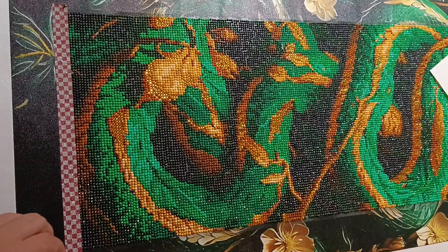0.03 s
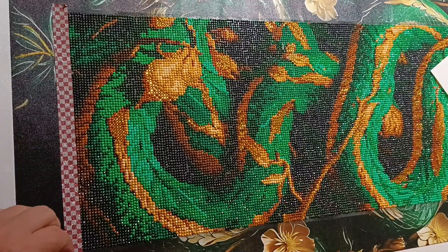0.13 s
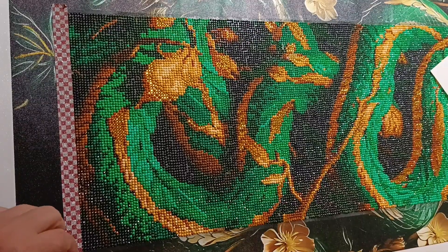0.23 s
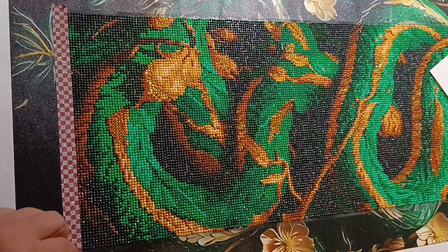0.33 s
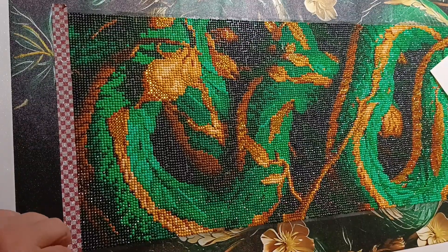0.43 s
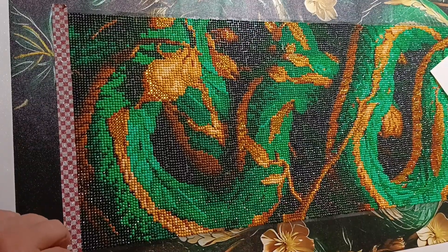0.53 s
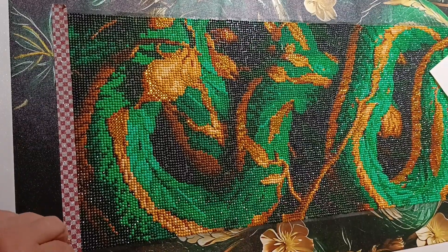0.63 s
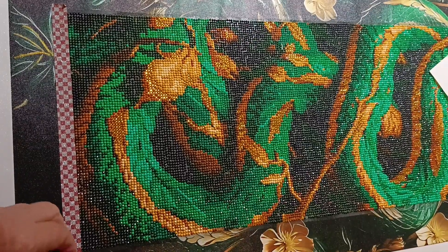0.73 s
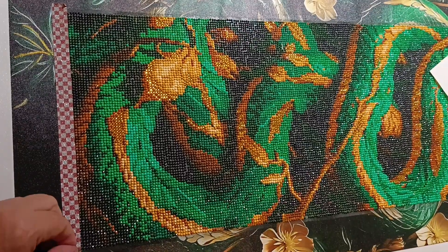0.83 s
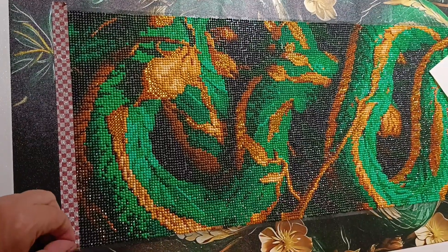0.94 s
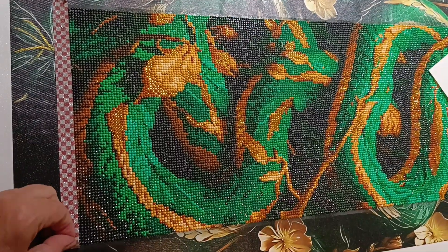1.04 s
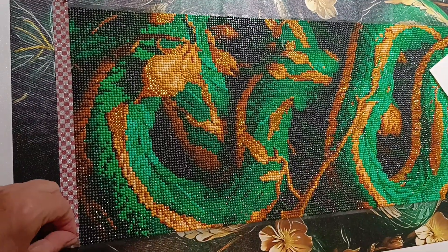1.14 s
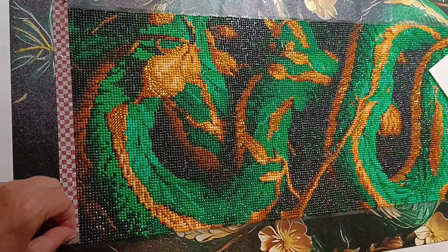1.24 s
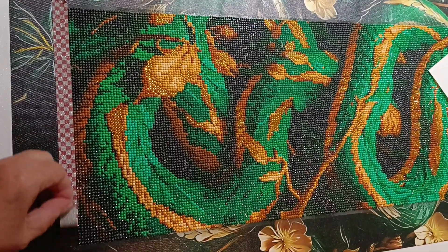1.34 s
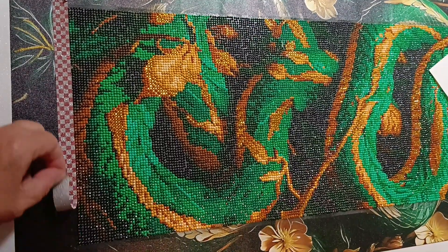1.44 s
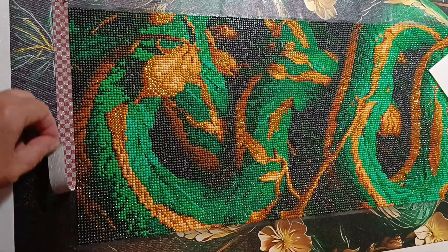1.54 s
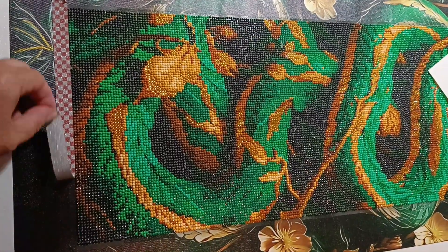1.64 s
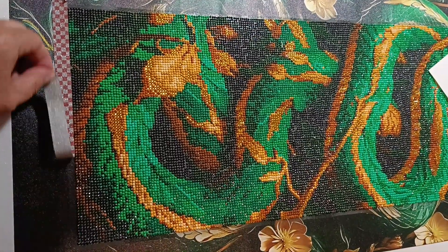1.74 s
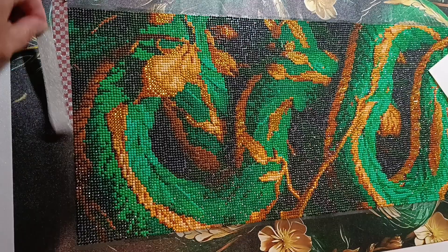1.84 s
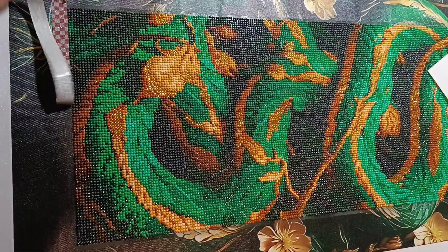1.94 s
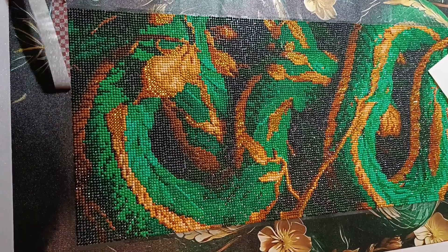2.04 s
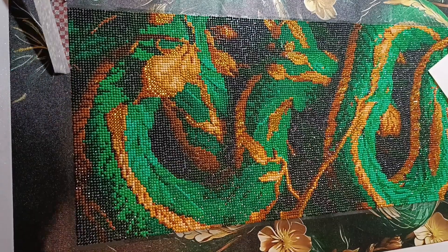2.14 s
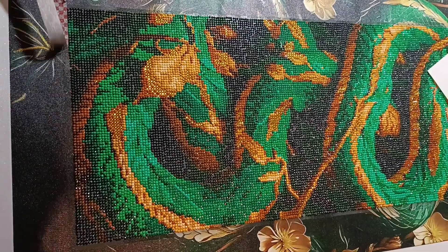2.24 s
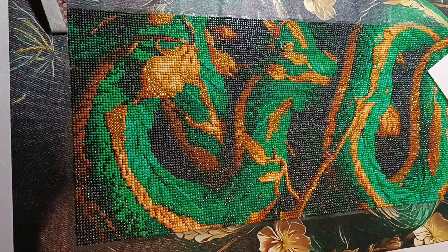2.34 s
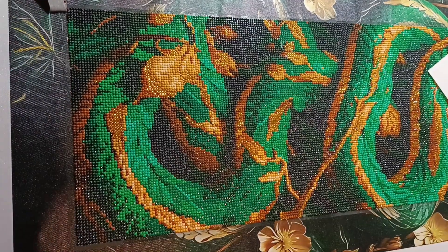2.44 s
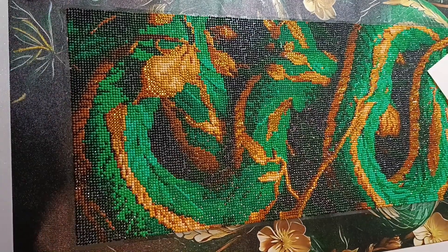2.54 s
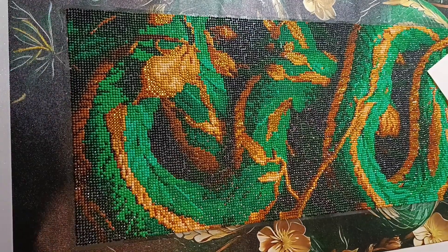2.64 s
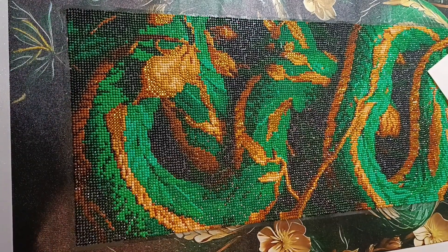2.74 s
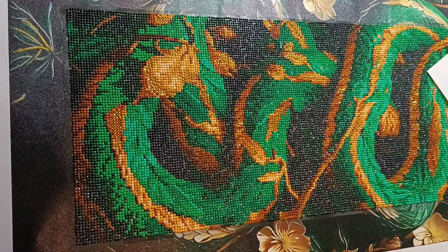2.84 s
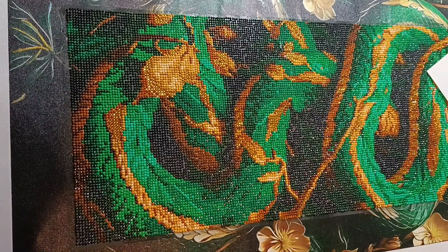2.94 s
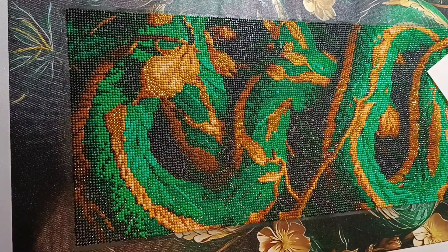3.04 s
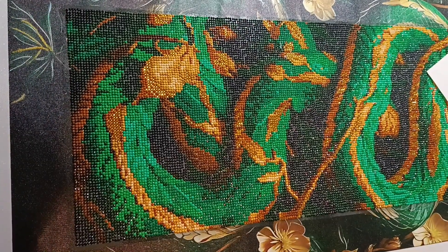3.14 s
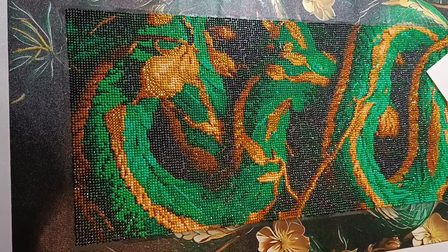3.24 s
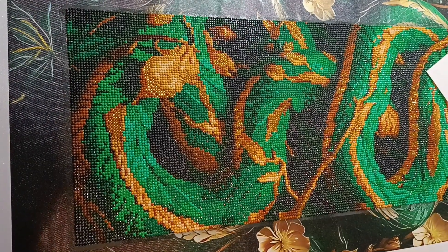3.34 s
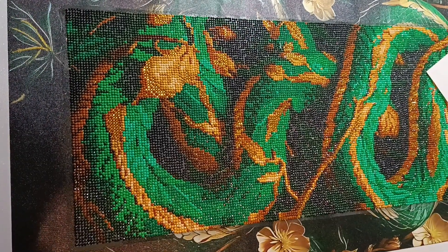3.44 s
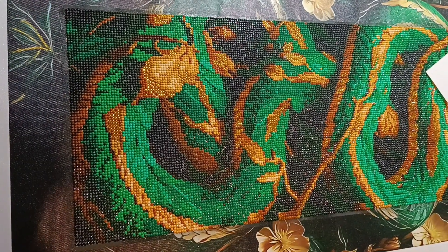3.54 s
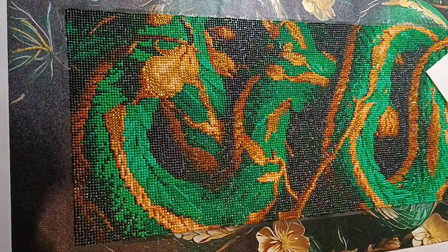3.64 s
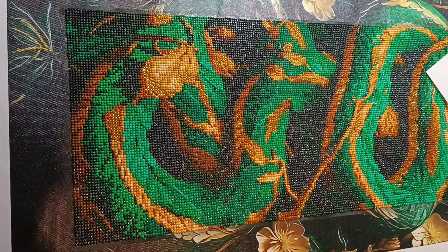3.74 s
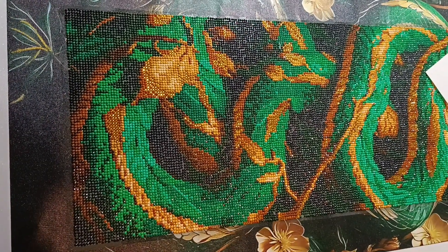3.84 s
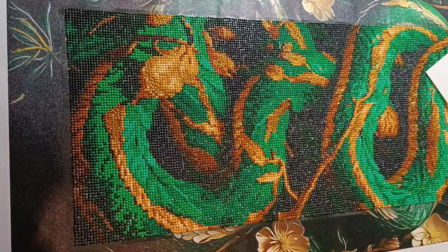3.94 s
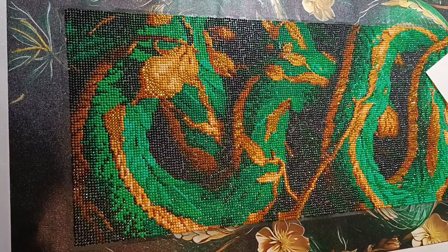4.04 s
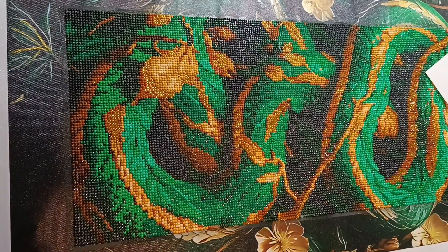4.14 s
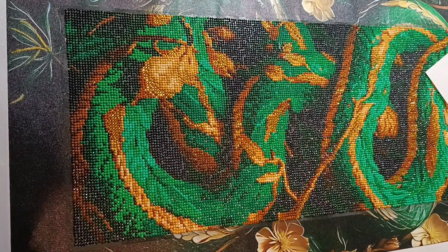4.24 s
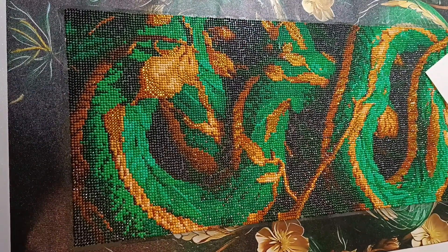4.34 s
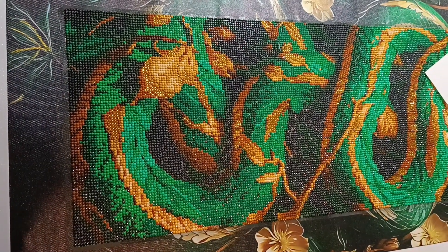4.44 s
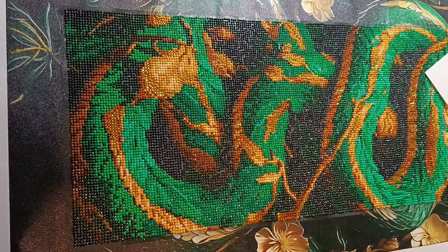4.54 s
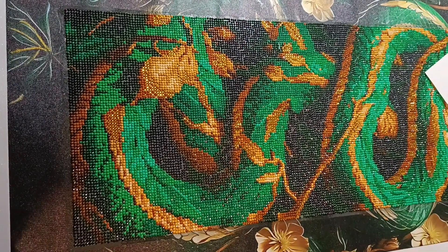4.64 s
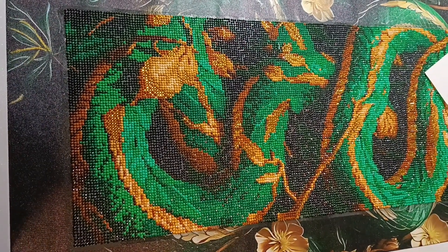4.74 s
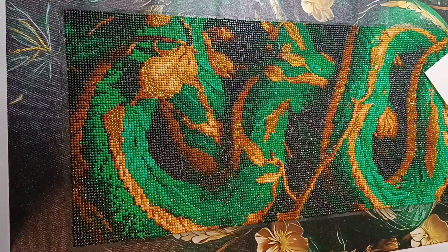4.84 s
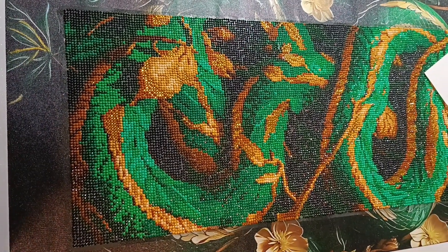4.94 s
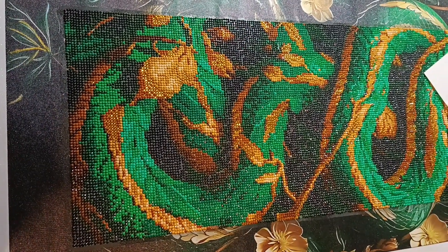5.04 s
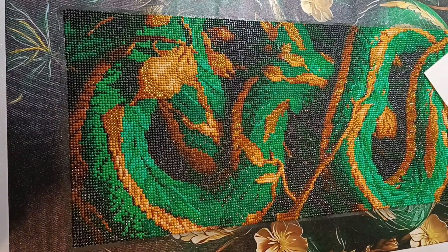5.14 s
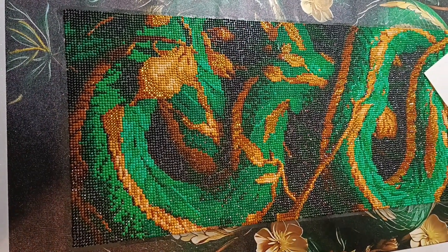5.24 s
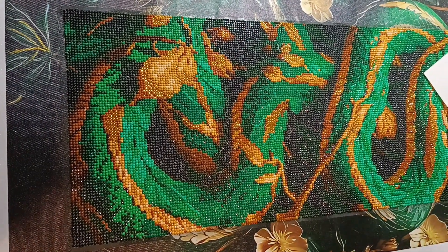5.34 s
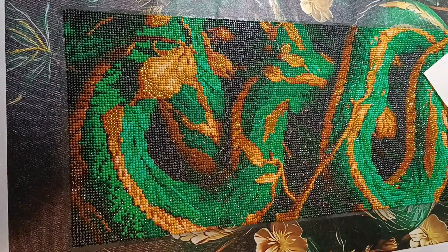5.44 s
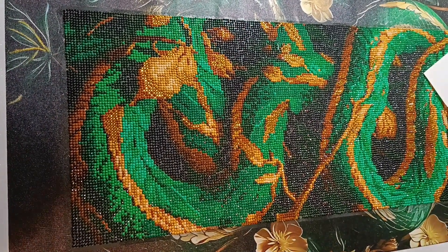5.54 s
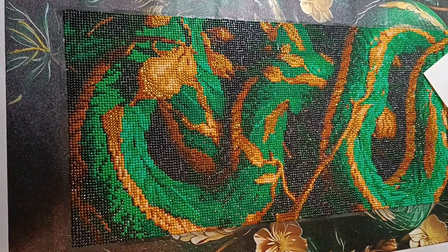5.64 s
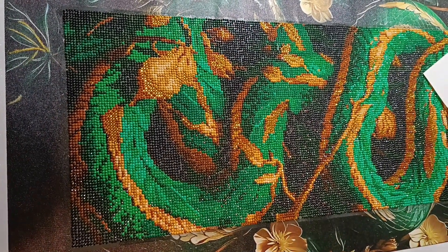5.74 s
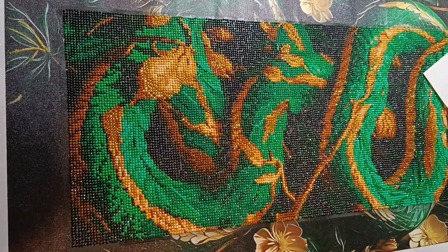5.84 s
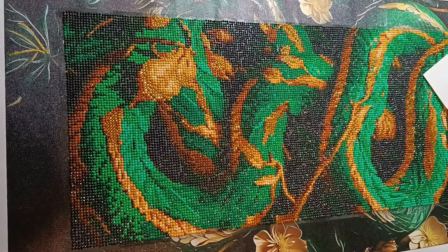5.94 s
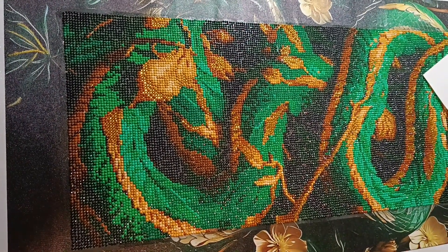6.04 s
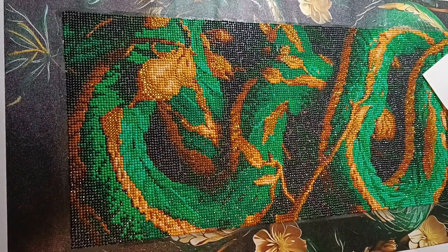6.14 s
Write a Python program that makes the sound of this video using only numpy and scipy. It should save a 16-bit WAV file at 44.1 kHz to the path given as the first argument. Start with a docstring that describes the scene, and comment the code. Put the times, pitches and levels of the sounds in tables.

```python
"""A strip of patterned tape is peeled off the sticky edge of a diamond painting canvas, close to a phone on a table.
Stiff film buckles with sharp clicks (short noise bursts through a resonance); glue lets go in swarms of tiny snaps.
Fingers hiss over the film (fine random grain), hard things are knocked, and hands bump (table modes) and drag
(low noise, one faint groan). A small room answers the film and the knocks; quiet air noise lies behind it all."""
import sys
import numpy as np
from scipy import signal
from scipy.fft import rfft, irfft
from scipy.io import wavfile

SR = 44100
rng = np.random.default_rng(int(sys.argv[2]) if len(sys.argv) > 2 else 0)


def store_wav(level_fs):
    """Save 16-bit WAV to argv[1]."""
    pcm = np.round(np.clip(np.atleast_2d(level_fs), -1, 1) * 32767)
    wavfile.write(sys.argv[1], SR, pcm.T.astype(np.int16))


N = 272524

# tone of film cracks, relative: f/Hz, level/dB
CRACK_TONE = [(200, -17.5), (700, -13), (1200, -10), (1800, -4), (3000, -1.5), (6000, -1.5), (8300, -2.5),
              (10000, 1.5), (12000, 5), (16000, 0)]
# tone of a hand working the table top, relative: f/Hz, level/dB
TABLE_RUB_TONE = [(40, -25), (75, -7.5), (112, 4), (150, -13.5), (195, 3.5), (245, -4), (310, -1),
                  (430, -6), (560, -17), (1000, -19), (2500, -22), (6000, -40)]


def snaps(peak_s=0.00025, q=3, ring_db=-2.5, crack_db=-0.1, apart=0.24, tilt_db_per_octave=5.5, even_hz=5150):
    """Each buckle is a burst about a millisecond long: a bright crack and the ring of its patch."""
    # sharpest snaps of the film: t/s, level/dB before the ring and crack offsets, ring pitch f/Hz
    snap_rows = [(0.053, -44, 6040), (.2733, -58, 7000), (.5436, -50, 6200), (0.849, -43.5, 3400),
                 (1.1337, -36, 4560), (1.2323, -31, 2590), (1.2366, -28, 2380), (1.263, -20.5, 2220),
                 (1.2813, -14.5, 2440), (1.2951, -16.5, 2440), (1.3055, -24, 2800), (1.3118, -25, 2870),
                 (1.3163, -19.5, 2900), (1.3374, -25.5, 3080), (1.343, -18, 3700), (1.7045, -31, 6950),
                 (1.8062, -28.5, 6900), (1.814, -34.5, 7300), (1.8419, -22.5, 6600), (1.8474, -27, 7500),
                 (1.8556, -13, 7530), (1.968, -39.5, 6300), (2.0139, -30, 7600), (2.0682, -36.5, 6000),
                 (2.0816, -33.5, 5200), (2.1098, -31.5, 4730), (2.128, -22.5, 5000), (2.1394, -21.5, 4370),
                 (2.159, -32, 6540), (2.172, -17, 4200), (2.1776, -16, 4040), (2.212, -23.5, 5300),
                 (2.2161, -24, 5330), (2.234, -32, 7300), (2.361, -21, 6500), (2.3816, -18.5, 5900),
                 (2.4626, -26, 7400), (2.4723, -14.5, 6130), (2.5046, -23.5, 3480), (2.5209, -24.5, 3660),
                 (2.6781, -33, 6800), (2.6866, -26, 3520), (2.7062, -35.5, 4800), (2.7716, -55, 3400),
                 (3.432, -38, 7400), (3.7462, -42, 6000), (4.7959, -31.5, 7500), (4.9394, -42, 7100),
                 (4.9661, -33.5, 5600)]
    rings, cracks = np.zeros((2, N)), np.zeros((2, N))
    t = clock(.008)
    shape = np.sqrt(t) * np.exp(-t / (2 * peak_s))
    for s, db, hz in snap_rows:
        # a smaller patch rings higher and cracks harder; no tilt at even_hz
        bright_db = tilt_db_per_octave * np.log2(hz / even_hz)
        body, crack = rng.choice([-1., 1.], (2, 3, len(t))) * shape
        body = ring(ports(body, apart), hz, q)
        add(rings, s, undb(db + ring_db - bright_db / 2) * blow(body))
        add(cracks, s, undb(db + crack_db + bright_db / 2) * blow(ports(crack, apart)))
    return rings + colour(cracks, CRACK_TONE)


def pulls(rate=800, q=4.9, ring_db=-2, crack_db=-2, canvas_db=-17):
    """Threads of glue break in quick succession and shake the free length of tape and the canvas."""
    # glue tearing loose: t/s, length/s, ring level/dB, ring pitch f/Hz, crack level/dB (levels before offsets)
    pull_rows = [(0.969, 0.033, -49.5, 2620, -66), (1.105, .04, -52, 2630, -48),
                 (1.208, 0.025, -47, 2200, -56), (1.228, 0.037, -38.5, 2130, -44),
                 (1.26, 0.033, -29, 2240, -29.5), (1.288, 0.0366, -29, 3100, -31),
                 (1.32, 0.015, -44, 3430, -39), (1.701, 0.0095, -40, 6840, -42),
                 (1.844, 0.019, -34, 3800, -38), (2.129, 0.039, -46, 4570, -36),
                 (2.159, 0.033, -26.5, 4020, -41), (2.201, 0.039, -44, 4300, -37),
                 (2.364, 0.041, -36.5, 5970, -35), (2.452, 0.034, -31, 6030, -34),
                 (2.501, 0.027, -32, 3700, -54), (2.681, 0.019, -50, 2960, -34),
                 (2.769, .046, -54, 2730, -42.5)]
    # the shaken canvas under the tape, relative: f/Hz, level/dB
    canvas_tone = [(100, -6), (300, -5), (700, -6), (1400, 0), (2200, -4.5), (4000, 9), (16000, -47)]
    rings, cracks, shakes = np.zeros((3, 2, N))
    for s, length, body_db, hz, top_db in pull_rows:
        count = len(clock(length))
        tear = swarm(SR // 4, rate, spread_db=4.0)[:, :count]
        tear = tear * signal.windows.tukey(count, .3)
        add(rings, s, undb(body_db + ring_db) * unit(ring(tear, hz, q)))
        add(cracks, s, undb(top_db + crack_db) * unit(tear))
        add(shakes, s, undb(body_db + canvas_db) * unit(tear))
    return rings + colour(cracks, CRACK_TONE) + colour(shakes, canvas_tone)


def swarm(count, rate, spread_db, slip_s=0.00053, apart=0.8):
    """Tiny slips at random moments (rate per second), most of them weak, each decaying over slip_s."""
    slips = rng.random(count) < rate / SR
    size = undb(spread_db * np.minimum(rng.exponential(size=count), 3))
    envelope = signal.lfilter([1], [1, -np.exp(-1 / (slip_s * SR))], slips * size)
    return envelope * ports(rng.standard_normal((3, count)), apart)


def ring(x, hz, q, edge=0.74):
    """A patch of film resonates broadly and radiates little below its pitch."""
    x = signal.lfilter(*signal.iirpeak(min(hz, SR / 4), max(q, 1), fs=SR), x)
    return signal.sosfilt(signal.butter(4, min(hz * edge, SR / 4), "high", fs=SR, output="sos"), x)


def slides(grain_db=2.0, tick_rate=30, tick_db=-14, press_db=2.23):
    """Fingers brush over the film with unsteady pressure: a soft, finely grained hiss with a few stray ticks."""
    # finger strokes: t/s, length/s, level/dB before the grain and tick offsets
    brush_rows = [(.05, 0.12, -66.5), (.49, 0.049, -70), (.755, 0.13, -57), (.95, 0.057, -53.5),
                  (1.085, 0.087, -62), (1.96, 0.24, -58.5), (3.425, 0.12, -58.5), (3.65, 0.023, -55.5),
                  (3.73, 0.019, -51.5), (3.78, 0.02, -53.5), (3.86, 0.14, -57.5), (4.115, 0.051, -60.5),
                  (4.175, 0.051, -54), (4.365, 0.035, -56.5), (4.495, 0.025, -60.5), (4.595, 0.086, -52.5),
                  (4.775, 0.073, -55), (4.91, 0.063, -60)]
    # tone of the hiss, relative: f/Hz, level/dB
    hiss_tone = [(500, -0.5), (1500, 0.5), (4000, 1.5), (7000, 6), (9000, -1), (12000, 6.5), (16000, -1)]
    grain = unit(colour(swarm(N, 3000, spread_db=4.0), hiss_tone))
    ticks = unit(colour(swarm(N, tick_rate, spread_db=2.0), CRACK_TONE))
    hiss = undb(grain_db) * grain + undb(tick_db) * ticks
    # pressure wanders below about 18 Hz
    pressure = unit(signal.sosfilt(signal.butter(2, 18, fs=SR, output="sos"), rng.standard_normal(N)))
    return hiss * undb(press_db * pressure) * strokes(brush_rows, attack_s=0.0072, release_s=0.021)


def knocks(decay_s=0.004, rattle_db=-13, rattle_s=0.019, ring_db=-5):
    """Hard things beside the canvas: a dry tick, a brief rattle and a short ring, drawn apart for each port."""
    # light knocks: t/s, level/dB of the tick before colouring
    knock_rows = [(4.005, -34.5), (4.2957, -37.5), (4.654, -38.5), (4.665, -36.5), (4.796, -53),
                  (4.9657, -54), (5.402, -29)]
    # tone of tick and rattle, relative: f/Hz, level/dB
    tick_tone = [(300, -23), (750, -8), (1100, -5.5), (1500, -3.5), (2300, -1.5), (2900, -5.5), (3800, -7),
                 (5500, -16), (8000, -25.5), (16000, -49)]
    # ringing of the knocked thing: f/Hz, relative level/dB, t60/s
    knock_modes = [(726, -9, 0.19), (1470, -15, 0.11), (1635, -7, 0.15), (2620, 0, 0.09), (2970, 6, 0.037),
                   (3580, -7, 0.048), (4900, -12, 0.043)]
    ticks, rings = np.zeros((2, N)), np.zeros((2, N))
    t = clock(.2)
    shape = np.exp(-t / decay_s) + undb(rattle_db) * np.exp(-t / rattle_s)
    for s, db in knock_rows:
        add(ticks, s, undb(db) * blow(shape) * rng.standard_normal((2, len(t))))
        body = np.array([strike(knock_modes, t, uneven_db=5) for port in range(2)])
        add(rings, s, undb(db + ring_db) * blow(body))
    return colour(ticks, tick_tone) + rings


def bumps(low_hz=68, thud_db=-2.5, thud_s=0.027):
    """A soft push sets the table modes ringing over a blunt thud; a longer contact is duller."""
    # soft bumps: t/s, level/dB before the contact smooths it, contact time/s
    bump_rows = [(.672, -45.5, 0.00052), (1.003, -58, 0.0031), (4.002, -35.5, 0.0018), (4.028, -36, .0016),
                 (4.294, -47.5, 0.0009), (4.647, -37.5, 0.00052), (4.661, -26.5, 0.00086),
                 (4.885, -45, 0.0033)]
    # modes of the table top: f/Hz, relative level/dB, t60/s
    table_modes = [(110.7, 1, 0.33), (182, -3.5, 0.52), (215, -6.5, .1), (247.3, -1.5, 0.34),
                   (319, -6, 0.13), (363, -4.5, 0.13), (399.8, 0, 0.18), (484, -11.5, 0.063),
                   (558, -18, 0.12), (830, -14.5, 0.14)]
    out, t = np.zeros((2, N)), clock(0.78)
    for s, db, contact in bump_rows:
        push = np.hanning(len(clock(contact)))
        thud = undb(thud_db) * diffuse(TABLE_RUB_TONE, count=len(t)) * np.exp(-t / thud_s)
        body = thud + strike(table_modes, t, uneven_db=1)
        add(out, s, undb(db) * signal.fftconvolve(body, push[None] / push.sum(), axes=-1))
    # a table top radiates little of its slowest motion
    return signal.sosfilt(signal.butter(4, low_hz, "high", fs=SR, output="sos"), out)


def drags(rumble_db=1.0, groan_hz=297, waver=.025, flutter_db=-2.0):
    """Skin rubs the table into a low rumble; one slow drag sticks and slips into a faint wavering groan."""
    # heel of a hand on the table: t/s, length/s, level/dB before rumble_db
    drag_rows = [(.08, 0.39, -54.5), (.26, 0.057, -51), (.53, .06, -51), (.655, 0.048, -47.5),
                 (.74, 0.11, -59.5), (.97, 0.048, -48.5), (1.12, 0.29, -54.5), (1.72, 0.39, -58.5),
                 (2.14, 0.09, -47.5), (2.46, 0.08, -45.5), (2.75, 0.21, -58.5), (3.03, 0.53, -53.5),
                 (4.15, 0.34, -56), (4.55, 0.23, -53.5), (4.76, 0.17, -49.5)]
    groan_rows = [(3.15, 0.22, -49.5)]  # t/s, length/s, level/dB before the flutter
    rumble = undb(rumble_db) * diffuse(TABLE_RUB_TONE)
    rumble = rumble * strokes(drag_rows, attack_s=0.0066, release_s=0.031)
    # pitch and grip wander below about 14 Hz
    slow = signal.butter(2, 14, fs=SR, output="sos")
    pitch, grip = unit(signal.sosfilt(slow, rng.standard_normal((2, N))))
    groan = np.sin(2 * np.pi * np.cumsum(groan_hz * (1 + waver * pitch)) / SR)
    groan = groan * undb(flutter_db * grip)
    return rumble + groan * strokes(groan_rows, attack_s=0.015, release_s=0.018)


def strokes(rows, attack_s, release_s, swell=0.2):
    """Gain over time of hand movements: each swells, longer ones more slowly, holds and dies away."""
    t, power = np.arange(N) / SR, np.zeros(N)
    for s, length, db in rows:
        rise = np.clip((t - s + attack_s) / (2 * attack_s + swell * length), 0, 1)
        fall = np.exp(-np.maximum(t - s - length, 0) / release_s)
        power += (undb(db) * rise * fall) ** 2
    return np.sqrt(power)


def strike(modes, t, uneven_db):
    """Ring of a body; neighbouring modes swing opposite ways, and each blow weights them a little differently."""
    hz, db, t60 = np.transpose(modes)[..., None]
    sign = np.cos(np.pi * np.arange(len(hz)))[:, None]
    weight = sign * undb(db + uneven_db * rng.standard_normal(hz.shape))
    return np.sum(weight * np.sin(2 * np.pi * hz * t) * undb(-60 * t / t60), axis=0)


def room(x, early_db=-7, early_s=0.004, late_db=-6, t60_mid=.2, t60_top=0.11, split_hz=5500):
    """Scatter from the table and things on it, then the short tail of the walls, shorter in the treble."""
    t = clock(.4)
    near, far = rng.standard_normal((2, 2, len(t)))
    # sparse echoes, starting after a millisecond
    early = near * (rng.random(near.shape) < .08) * (t > .001) * np.exp(-t / early_s)
    low = signal.sosfiltfilt(signal.butter(1, split_hz, fs=SR, output="sos"), far)
    late = low * undb(-60 * t / t60_mid) + (far - low) * undb(-60 * t / t60_top)
    late *= 1 - np.exp(-(t / 0.0053) ** 2)  # the tail builds up over some milliseconds
    response = (undb(early_db) * unit(early) + undb(late_db) * unit(late)) / np.sqrt(len(t))
    return signal.fftconvolve(x, response, axes=-1)[:, :N]


def air(level_db=-54.5):
    """The quiet room: steady, softly coloured stereo noise."""
    # tone of the noise, relative: f/Hz, level/dB per Hz
    air_tone = [(20, -28), (36, -13), (51, 2.5), (68, -10), (110, 0), (150, -1), (195, -1), (320, -4),
                (550, -11.5), (1000, -16), (2400, -15.5), (5000, -26), (9000, -35.5), (15500, -32)]
    return diffuse(air_tone) * undb(level_db)


def diffuse(points, count=N, apart_hz=700, stray=0.56):
    """Stereo noise, more alike at both ports in the bass than in the treble."""
    mid, side, own = rng.standard_normal((3, count))
    side = signal.lfilter(*signal.butter(1, apart_hz, "high", fs=SR), side) + stray * own
    return unit(colour(np.array([mid + side, mid - side]), points))


def ports(x, apart):
    """Left and right take a common part and each a share (0-1) of their own; x has three rows."""
    apart = np.clip(apart, 0, 1)
    return np.sqrt(1 - apart) * x[0] + np.sqrt(apart) * x[1:]


def port_treble(x):
    """The two microphone ports favour different treble; their summed power gain stays even."""
    # difference of the ports: f/Hz, left minus right level/dB
    port_rows = [(100, -1.5), (2000, 1), (5500, -0.5), (7700, -5), (9000, 0.5), (11500, 13), (16000, 7)]
    hz, lean_db = np.transpose(port_rows)
    lean = undb(np.interp(np.fft.rfftfreq(N, 1 / SR), hz, lean_db))
    gains = np.array([lean, np.ones_like(lean)]) * np.sqrt(2 / (1 + lean ** 2))
    return irfft(rfft(x) * gains, N)


def colour(x, points, size=4096):
    """Causal minimum-phase filter through (f/Hz, level/dB) points; keeps the power of white noise."""
    hz, db = np.transpose(points)
    log_hz = np.log(np.fft.rfftfreq(size, 1 / SR) + 1)
    gain = unit(undb(np.interp(log_hz, np.log(hz), db)))
    # folding the cepstrum makes the response causal
    cepstrum = irfft(np.log(gain))
    cepstrum[1:size // 2] *= 2
    cepstrum[size // 2 + 1:] = 0
    response = irfft(np.exp(rfft(cepstrum)))
    response = response.reshape((1,) * (x.ndim - 1) + (-1,))
    return signal.fftconvolve(x, response, axes=-1)[..., :x.shape[-1]]


def blow(x):
    """Scale a click to the energy of one millisecond at rms one, in each channel."""
    return _blow(x)


def _blow(x):
    """Energy scaling along the last axis."""
    energy = np.sum(x ** 2, axis=-1, keepdims=True)
    return x * np.sqrt(SR / 1000 / energy)


def undb(db):
    """Decibels to gain."""
    return 10 ** (np.asarray(db) / 20)


def unit(x):
    """Scale to an rms of one."""
    return x / np.sqrt(np.mean(x ** 2) + 1e-20)


def clock(seconds):
    """Sample times of a stretch."""
    return np.arange(max(int(seconds * SR), 8)) / SR


def add(out, s, x):
    """Mix x into out from time s on."""
    i = max(int(s * SR), 0)
    out[..., i:i + x.shape[-1]] += x[..., :max(N - i, 0)]


def scene(port_lag_s=.00023):
    """The tape lies to the left, so its sound reaches the right port a little later."""
    left, right = snaps() + pulls() + slides()
    near = np.array([left, np.roll(right, int(port_lag_s * SR))]) + knocks()
    near = port_treble(near + room(near))
    table = (bumps() + drags()) * undb([[0], [-1.2]])  # left, right gain in dB
    return near + table + air()


def record(dry, top_hz=16200):
    """The phone cuts the top."""
    return signal.sosfilt(signal.ellip(10, .2, 70, top_hz, fs=SR, output="sos"), dry)


dry = scene()
out = record(dry)
store_wav(out)
```